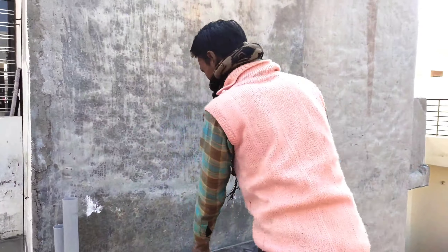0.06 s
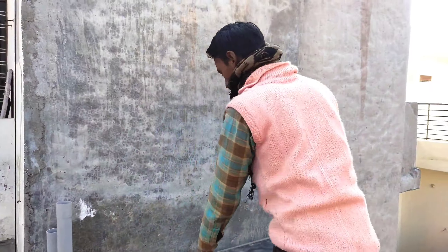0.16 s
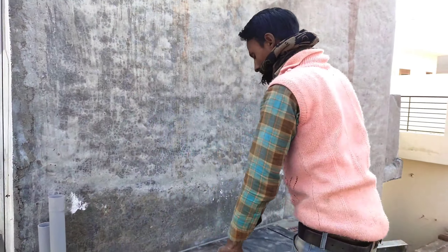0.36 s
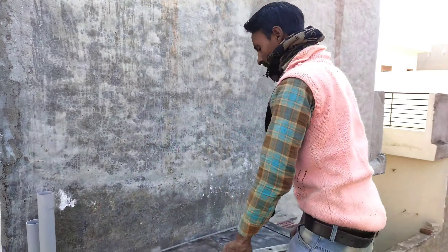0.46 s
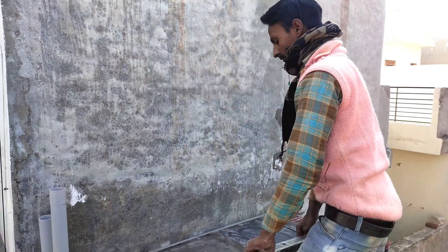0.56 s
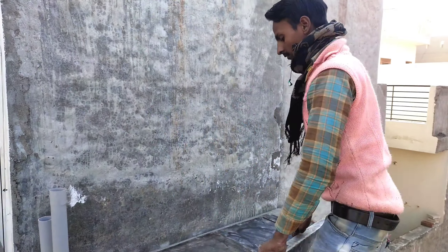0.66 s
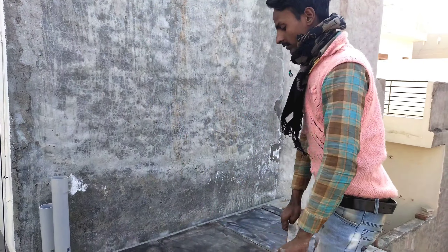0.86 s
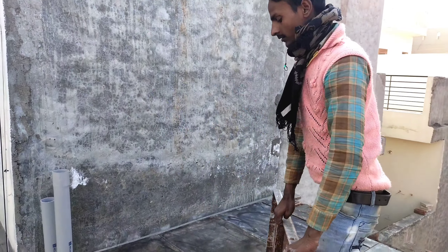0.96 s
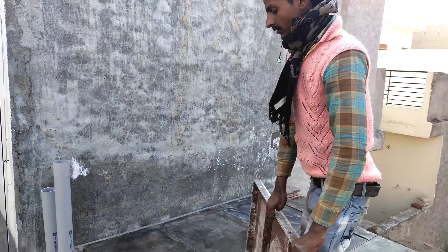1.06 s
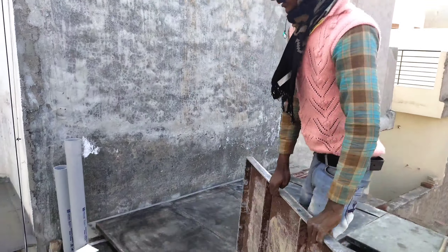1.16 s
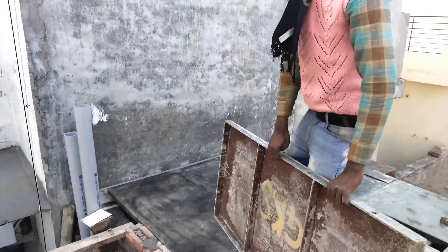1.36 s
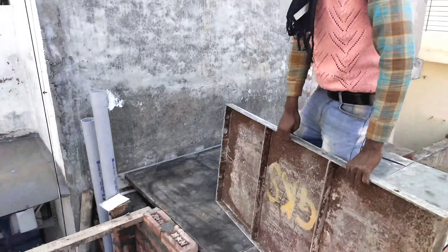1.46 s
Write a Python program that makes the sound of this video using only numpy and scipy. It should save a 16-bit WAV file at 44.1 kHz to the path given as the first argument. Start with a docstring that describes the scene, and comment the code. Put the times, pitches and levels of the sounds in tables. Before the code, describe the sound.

A steel plate clatters and scrapes, then is set down with a short clunk.

```python
"""Moving a steel plate

Outdoors, a steel plate is dragged up off a stack, clatters against its neighbours and is swung onto a
brick wall. Its edge rasps, the knocks make it ring, and it slides off with gritty scrapes and a thin
rising squeal. It lands with a short clunk, damped by the hands. Dull thumps go with the steps."""
import sys
import numpy as np
from scipy import signal
from scipy.fft import rfft, irfft
from scipy.io import wavfile

SR = 44100
rng = np.random.default_rng(int(sys.argv[2]) if len(sys.argv) > 2 else 0)


def digitize_waveform(pressure):
    """Quantize a signal to 16-bit integers and store it at the path in sys.argv[1].

    Rows of a 2-D input are taken as channels; values are limited to [-1, 1].
    """
    field = np.atleast_2d(pressure).T
    bounded = np.clip(field, -1, 1)
    quanta = np.round(bounded * 32767).astype(np.int16)
    wavfile.write(sys.argv[1], SR, quanta)


N = 66150
T = np.arange(N) / SR

# The tone of each noise, from bass to treble. Each row: frequency in Hz, relative level in dB.
AIR_TONE = [(15, -21.5), (30, 1.5), (117, -2.5), (230, -13.5), (420, -15), (750, -17.5), (1280, -29),
            (2000, -36.5), (3400, -45.5), (5000, -49), (9000, -51), (15000, -51.5)]
SOFT_SCRAPE_TONE = [(200, -22), (700, -7), (1050, -3), (1300, 2), (1800, -2.5), (2400, -0.5), (2900, -6.5),
                    (3500, -2.5), (4300, -9.5), (5000, -12.5), (6500, -12.5), (7500, -22), (8600, -13),
                    (11000, -31), (15000, -34)]
RASP_TONE = [(120, -27), (250, -8), (450, -2), (660, -9.5), (800, -7.5), (1300, -3.5), (1700, -0.5),
             (2100, -9), (2600, -8.5), (3500, -21.5), (4300, -20.5), (6500, -28.5), (7800, -36),
             (9000, -34.5), (10000, -41), (15000, -56)]
SLIDE_TONE = [(2500, -8), (4200, -10.5), (5200, 4), (6100, -6.5), (6800, -1.5), (7500, -21), (14000, -25)]
LANDING_TONE = [(120, -25.5), (230, -14), (345, 3.5), (440, 2), (540, -15.5), (640, -5.5), (850, -12.5),
                (1240, -6.5), (1850, -21.5), (2500, -25.5), (3400, -37.5), (5000, -49), (6500, -66),
                (12000, -73.5)]
# Dull thumps. Each row: start in seconds, level in dB, rise, hold and fade in seconds, pitch in Hz.
LOW_THUMPS = [(.005, -50.5, 0.023, 0.047, 0.048, 42), (0.04, -54, .025, .025, 0.025, 108),
              (0.324, -36.5, .015, .015, 0.035, 73), (0.382, -42.5, 0.017, 0.032, .02, 114.8),
              (0.552, -50, 0.028, 0.061, .02, 104), (0.735, -43.5, 0.008, 0.054, 0.018, 68.7),
              (0.742, -50.5, .02, 0.038, .085, 120.8), (1.267, -49, 0.04, 0.037, 0.062, 45.8),
              (1.255, -55, 0.036, 0.057, 0.047, 135)]
# Squeaks, groans and clinks of the edge. Each row reads like a thump's.
EDGE_SQUEAKS = [(0, -65.5, 0.0086, .08, 0.018, 1007), (0.1868, -39.5, 0.0028, 0.0071, .008, 672),
                (.225, -53, 0.0061, 0.045, .02, 935), (0.649, -44.5, .01, 0.033, .012, 713),
                (0.761, -60, .02, 0.073, 0.042, 448), (1.077, -62.5, 0.024, 0.037, 0.022, 1308),
                (1.346, -69, .02, 0.026, 0.014, 1290), (1.478, -65, .001, 0.0011, 0.0043, 2114)]
# Soft, gritty scrapes as the plate slides. Each row: start in seconds, relative level in dB,
# rise, hold and fade in seconds, treble limit in Hz.
SOFT_SCRAPES = [(0.023, -57.5, 0.056, 0.011, 0.027, 2780), (0.132, -57, .04, 0.015, .008, 2000),
                (0.961, -68, 0.014, 0.0029, 0.012, 3990), (1.059, -71.5, 0.018, .01, 0.023, 5000),
                (1.086, -63, 0.025, 0.025, 0.021, 9050), (1.318, -66.5, 0.026, 0.06, .022, 1200),
                (1.475, -61.5, .001, 0.0015, 0.0037, 2150)]
# The edge rasps on masonry. Each row reads like a soft scrape's.
EDGE_RASPS = [(0.187, -36.5, 0.0019, 0.0062, 0.005, 2500), (0.195, -39, 0.012, .009, 0.019, 7940),
              (0.216, -47, 0.0096, 0.015, 0.017, 14100), (0.2298, -33, 0.00038, 0.0009, 0.0019, 5490),
              (0.28, -59.5, .004, 0.0054, .03, 2400), (0.3, -52, .001, .001, 0.0022, 3000),
              (0.31, -46, .002, 0.0017, .006, 1804)]
# Specks of grit snap. Each row: start in seconds, relative level in dB.
GRIT_SNAPS = [(0.284, -55), (.378, -63), (.521, -62), (.537, -56.5), (0.683, -67.5), (.931, -70),
              (1.2943, -65)]
# The sliding edge hisses and sings. Each row: time in seconds, level in dB.
HISS_LEVELS = [(0, -100), (.12, -81), (.27, -77), (.385, -72), (.44, -78.5), (.54, -73.5), (.63, -92),
               (.75, -105)]
SINGING_LEVELS = [(.3, -84.5), (.45, -45.5), (.62, -48.5), (.67, -48.5), (.72, -59.5), (.8, -64),
                  (.9, -83.5), (1.02, -100)]
# The edge squeals. Each row: time in seconds, middle pitch in Hz, level in dB.
SQUEAL_PATH = [(.40, 3293, -91.5), (.44, 3314, -66), (.495, 3344, -67), (.525, 3407, -61.5),
               (.61, 3410, -61), (.735, 3477, -68.5), (.80, 3414, -81), (.86, 3480, -87.5),
               (.89, 3480, -115)]
# The notes of the struck wall and plate. Each row: pitch in Hz, relative level in dB,
# seconds to fade by 60 dB.
WALL_NOTES = [(366, -32, 0.1), (384, -40.5, 0.075), (634, -35.5, 0.12)]
PLATE_NOTES = [(252.2, 4.5, 0.2), (341.2, 3, 0.21), (400.7, -1, 0.28), (442.2, 0, 0.31), (484, -2, 0.49),
               (513.4, 0.5, 0.25), (560.7, -0.5, 0.15), (662, -8, .33), (700.2, 2.5, 0.39),
               (712, -4.5, .36), (877, 0.5, 0.2), (943, -2, 0.3), (1184.5, -9.5, 0.69), (1267, -9.5, .55),
               (1338, -12, 0.28), (1468, -3, .32), (1658, -3, 0.25), (1904, -0.5, 0.15)]
# The plate's crowd of weaker notes. Each row: frequency in Hz, relative level in dB.
CROWD_TONE = [(60, -10.5), (160, -23), (200, -4.5), (280, -1.5), (500, 3.5), (800, 1.5), (1050, -2),
              (1350, -8.5), (1900, -8), (2500, -13), (3200, -20.5), (4500, -26.5)]
# The plate hits its neighbours. Each row: start in seconds, relative level in dB,
# chatter fade in seconds, treble limit in Hz, bass limit in Hz.
PLATE_KNOCKS = [(.3228, -31, 0.006, 2680, 151.7), (0.3363, -24.5, 0.0068, 2130, 110),
                (.3495, -24, 0.0054, 1860, 108.4), (.373, -32, 0.018, 2120, 168.5),
                (.402, -34, 0.0047, 1110, 170), (.424, -31.5, 0.019, 1740, 270),
                (.478, -42.5, 0.066, 2010, 481), (.5505, -36, 0.0074, 1944, 238.3),
                (.566, -34, 0.015, 1785, 239), (.622, -44, 0.0061, 1290, 498),
                (.662, -39, 0.0064, 768, 617)]
# The tightening grip mutes the ringing. Each row: time in seconds, level change in dB.
GRIP_MUTING = [(.685, 0), (.73, -9.5)]


def from_db(db):
    """Turn decibels into a multiplier."""
    return 10 ** (np.asarray(db) / 20)


def unit(x):
    """Scale to an average power of 1."""
    return x / np.sqrt(np.mean(x ** 2) + 1e-20)


def energy_one(x):
    """Scale to a total energy of 1."""
    return unit(x) / np.sqrt(N)


def in_time(rows):
    """Join the rows of a curve by straight lines."""
    times, *columns = np.transpose(rows)
    return [np.interp(T, times, column) for column in columns]


def dull(x, edge_hz, order=2):
    """Turn down the treble above edge_hz."""
    return signal.sosfilt(signal.butter(order, edge_hz, fs=SR, output="sos"), x + 1e-18)


def coloured(x, tone):
    """Shape a steady noise with a tone table, at power 1."""
    hz, db = np.transpose(tone)
    gain = from_db(np.interp(np.log(np.fft.rfftfreq(N, 1 / SR) + 1), np.log(hz), db))
    return unit(irfft(rfft(x) * gain, N))


def narrow(hz, width_hz):
    """Noise around one pitch, its swings of level partly evened out."""
    offset = 2 * (np.fft.fftfreq(N, 1 / SR) - hz) / width_hz
    band = np.fft.ifft(np.fft.fft(rng.standard_normal(N)) / (1 + offset ** 4))
    return unit(band.real / np.sqrt(np.abs(band)))


def grit(per_s, spread_db):
    """Tiny random collisions of uneven size."""
    hits = (rng.random(N) < per_s / SR) * rng.choice([-1, 1], N)
    return hits * from_db(spread_db * np.minimum(rng.exponential(1, N), 4))


def stroke(start, db, rise, hold, fade):
    """A level that rises, holds and fades away."""
    rising = np.clip((T - start) / rise, 0, 1)
    return from_db(db) * rising * np.exp(-np.maximum(T - start - rise - hold, 0) / fade)


def burst(start, fade):
    """A level that jumps up and fades away."""
    return (T > start) * np.exp(-np.abs(T - start) / fade)


def dying(seconds):
    """A level that falls by 60 dB in the given time."""
    return np.exp(-np.log(1000) * T / seconds)


def note(hz, db, seconds):
    """One pure, fading tone."""
    return from_db(db) * dying(seconds) * np.sin(2 * np.pi * hz * T)


def open_air():
    """The faint, steady rumble of outdoors."""
    return from_db(-61) * coloured(rng.standard_normal(N), AIR_TONE)


def wall_echo(sound):
    """Walls send back a weak, dull echo after 12 milliseconds."""
    echo = dull(rng.standard_normal(N), edge_hz=1510) * dying(.42) * (T > .012)
    return from_db(-21) * signal.fftconvolve(sound, energy_one(echo))[:N]


def thumps():
    """Low bumps of steps and of the flexing plate."""
    return sum(narrow(hz, width_hz=.9 * hz) * stroke(*shape) for *shape, hz in LOW_THUMPS)


def scrapes():
    """Grit is crushed under the sliding plate: it rasps, snaps and hisses."""
    rasp = coloured(grit(7000, spread_db=3), RASP_TONE)
    soft_grit = coloured(grit(5500, spread_db=4), SOFT_SCRAPE_TONE)
    edge = sum(dull(rasp * stroke(*shape), hz) for *shape, hz in EDGE_RASPS)
    soft_scrapes = sum(dull(soft_grit * stroke(*shape), hz) for *shape, hz in SOFT_SCRAPES)
    snap_level = sum(from_db(db - 7) * burst(start, fade=.00087) for start, db in GRIT_SNAPS)
    snaps = narrow(5200, width_hz=5300) * snap_level
    hiss = coloured(grit(2700, spread_db=3.5), SLIDE_TONE) * from_db(in_time(HISS_LEVELS)[0])
    return edge + soft_scrapes + snaps + hiss


def squeaks():
    """The edge sticks and slips for a moment."""
    return sum(narrow(hz, width_hz=110) * stroke(*shape) for *shape, hz in EDGE_SQUEAKS)


def squeal():
    """Steel slides on steel: three close, wavering tones beat over a lower singing noise."""
    hz, db = in_time(SQUEAL_PATH)
    split_hz, waver_hz = 77, 16
    tones = np.zeros(N)
    for step, gain in ((-.78, .64), (0, .91), (.99, .7)):
        pitch = hz + step * split_hz + waver_hz * narrow(0, width_hz=70)
        tones += gain * np.sin(2 * np.pi * np.cumsum(pitch) / SR)
    hiss = .55 * narrow(3450, width_hz=350)
    singing = narrow(1295, width_hz=170) * from_db(in_time(SINGING_LEVELS)[0])
    return unit(tones + hiss) * from_db(db) + singing


def landing():
    """The edge crunches onto brick and the wall answers with a short thunk."""
    crunch = coloured(grit(5000, spread_db=2.5), LANDING_TONE)
    crunch *= stroke(start=1.2, db=-34.5, rise=.009, hold=.016, fade=.016)
    thunk_start_s, thunk_rise_s = 1.204, .006
    thunk = sum(note(*row) for row in WALL_NOTES) * np.minimum(T / thunk_rise_s, 1)
    return crunch + np.interp(T - thunk_start_s, T, thunk, left=0)


def plate_ring():
    """One tap on the plate gives strong notes, a crowd of weaker ones and a short crack."""
    strong = sum(note(*row) * rng.choice([-1, 1]) for row in PLATE_NOTES)
    crowd_hz = 11 * (np.arange(5, 430) + rng.uniform(-.5, .5, size=425))  # about 11 Hz apart
    spectrum = np.zeros(N // 2 + 1, complex)
    spectrum[(crowd_hz * N / SR).astype(int)] = np.exp(2j * np.pi * rng.random(len(crowd_hz)))
    crowd = coloured(irfft(spectrum, N), CROWD_TONE)
    ringing = from_db(.5) * energy_one(crowd * dying(.28))
    crack = from_db(-4) * energy_one(crowd * dying(.03))
    return energy_one(energy_one(strong) + ringing + crack)


def knock(start, db, chatter_s, treble_hz, bass_hz):
    """The push of one blow and its dying run of little bounces."""
    force = .77 * grit(900, spread_db=2) * burst(start, chatter_s)
    force[int(start * SR)] += 1  # the blow itself
    bass_cut = signal.butter(2, bass_hz, "high", fs=SR, output="sos")
    force = signal.sosfilt(bass_cut, unit(force) + 1e-18)
    return from_db(db - 15) * dull(force, treble_hz, order=3)


def plate():
    """All the knocks ring the same plate, and the grip then quietens it."""
    force = sum(knock(*row) for row in PLATE_KNOCKS)
    return signal.fftconvolve(force, plate_ring())[:N] * from_db(in_time(GRIP_MUTING)[0])


def scene():
    """Mix the handling, its echo, the air and the thumps into one channel."""
    handling = plate() + scrapes() + squeal() + squeaks() + landing()
    return (handling + wall_echo(handling) + open_air() + thumps())[None]


def record(dry):
    """Cut the treble above 15500 Hz."""
    return signal.sosfilt(signal.ellip(10, .2, 70, 15500, fs=SR, output="sos"), dry)


dry = scene()
out = record(dry)
digitize_waveform(out)
```